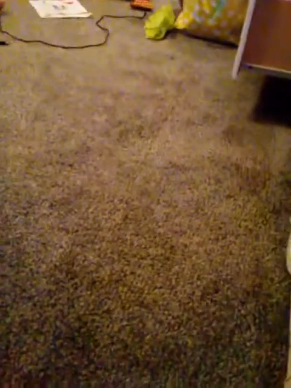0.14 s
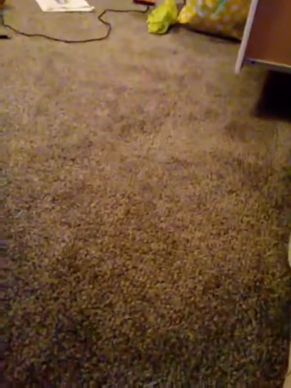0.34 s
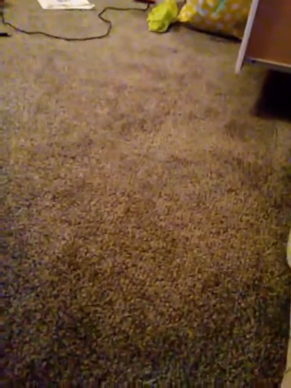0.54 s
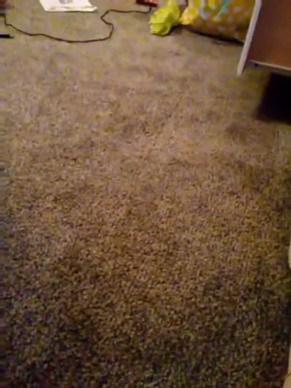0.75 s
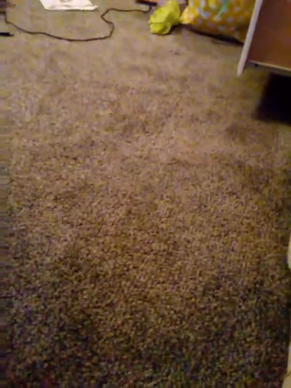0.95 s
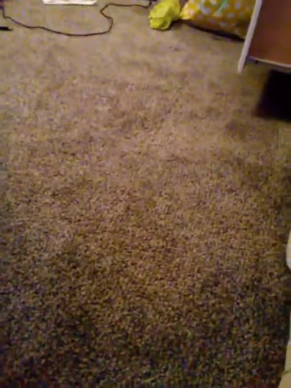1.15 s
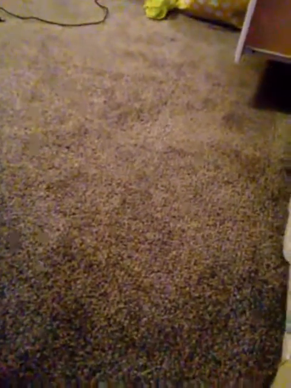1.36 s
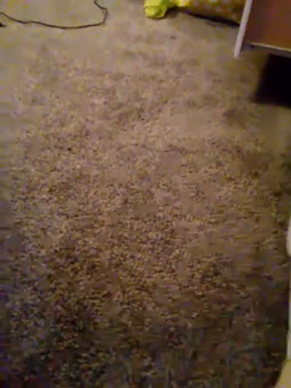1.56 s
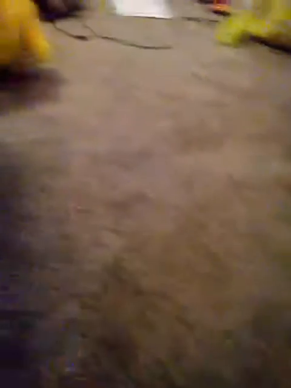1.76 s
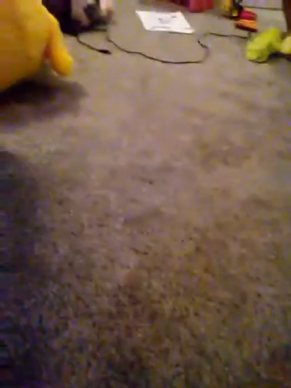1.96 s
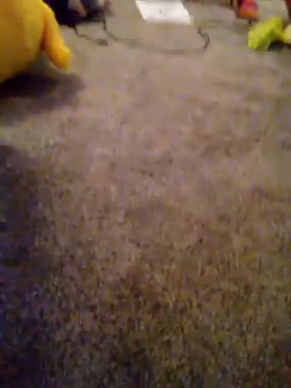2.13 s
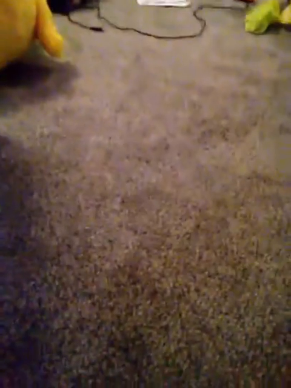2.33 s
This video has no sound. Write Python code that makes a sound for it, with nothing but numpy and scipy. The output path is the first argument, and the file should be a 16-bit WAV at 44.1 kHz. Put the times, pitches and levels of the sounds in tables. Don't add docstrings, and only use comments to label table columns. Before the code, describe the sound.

A rubber squeaky toy is squeezed close to a phone in a carpeted bedroom, the first squeak already ending, two more following with air hisses; then quiet finger ticks and a brief cloth rustle over faint hum.

```python
import sys
import numpy as np
from scipy import signal
from scipy.fft import rfft, irfft
from scipy.io import wavfile
from scipy.ndimage import uniform_filter1d, minimum_filter1d

SR = 44100
rng = np.random.default_rng(int(sys.argv[2]) if len(sys.argv) > 2 else 0)


def makeup_ratio(level_db):
    decades = np.asarray(level_db, float) / 20
    return 10 ** decades


def pcm_store(signal):
    levels = np.round(np.clip(np.atleast_2d(signal), -1, 1) * 32767)
    wavfile.write(sys.argv[1], SR, levels.astype(np.int16).T)


N = 109897


def curve(table, x):
    return np.interp(x, *np.array(table, float).T)


def colour(table):
    hz, db = np.array(table, float).T
    f = np.maximum(np.arange(N // 2 + 1) * SR / N, 1)
    gain = makeup_ratio(np.interp(np.log(f), np.log(hz), db, -60, -60))
    x = irfft(rfft(rng.standard_normal(N)) * gain, N)
    return x / np.std(x)


def walk(rate_hz):
    k = int(SR / rate_hz)
    held = np.repeat(rng.standard_normal(N // k + 1), k)
    return 1.2 * uniform_filter1d(uniform_filter1d(held, k), k)[:N]


def step(t, width_s):
    return 1 / (1 + np.exp(-np.clip(t / width_s, -40, 40)))


def puff(t, center_s, width_s):
    return np.exp(-((t - center_s) / width_s) ** 2)


def band(x, lo_hz, hi_hz):
    return signal.sosfilt(signal.butter(3, [lo_hz, hi_hz], "bandpass", fs=SR, output="sos"), x)


# (frequency [Hz], density [dB per Hz])
FLOOR_COLOUR = [(35, -18), (200, -11), (480, -5.5), (700, -8), (860, 0), (1150, -12.5), (4000, -19),
                (4400, -36)]
FLOOR_DB = -57.5
EARLY_DB, EARLY_ENDS_S = 2.5, .95


def room_noise(t, flicker):
    noise = colour(FLOOR_COLOUR)
    edges_hz = [30, 150, 400, 700, 1200, 2200, 4300]
    floor = 0
    for lo_hz, hi_hz in zip(edges_hz, edges_hz[1:]):
        floor = floor + band(noise, lo_hz, hi_hz) * makeup_ratio(1.9 * flicker + 1.2 * walk(47))
    return makeup_ratio(FLOOR_DB + EARLY_DB * step(EARLY_ENDS_S - t, .03)) * floor / np.std(floor)


HUM_HZ, HUM_DB = 245, -65.5


def appliance_hum(t):
    return makeup_ratio(HUM_DB + 3.5 * walk(18)) * np.sin(2 * np.pi * HUM_HZ * t)


HISS_DB = -76


def microphone_hiss(flicker):
    return makeup_ratio(HISS_DB + 1.1 * flicker) * colour([(4200, -3), (5500, -8), (9000, -2), (15700, -1)])


# (time [s], level [dB])
TICKS = [
    (1.157, -44),
    (1.25, -48.5),
    (1.297, -50.5),
    (1.408, -50.5),
    (1.564, -50),
    (1.671, -44.5),
    (1.704, -45.5),
    (2.164, -48.5),
    (2.419, -49),
]
# (frequency [Hz], level [dB])
TICK_COLOUR = [(100, -11), (900, 0.5), (4000, -12.5), (4400, -30), (12000, -23), (15600, -18.5)]
TICK_S = 0.0056


def handling_ticks(t):
    bursts = sum(makeup_ratio(db - 9.5) * puff(t, s + TICK_S, TICK_S) for s, db in TICKS)
    return bursts * colour(TICK_COLOUR)


# (time [s], level [dB])
RUSTLE = [
    (1.55, -77),
    (1.64, -63),
    (1.69, -53),
    (1.74, -56),
    (1.9, -53),
    (2.03, -57),
    (2.07, -63),
    (2.16, -78),
]
# (frequency [Hz], level [dB])
CLOTH_COLOUR = [(60, -5.5), (900, -1), (2000, -7.5), (4000, -6), (4400, -31.5), (5700, -28), (6800, -11),
                (15500, -24.5)]
MURK_DB = -60.5


def cloth_rustle(t):
    moving = abs(t - 1.85) < .33
    rub = makeup_ratio(curve(RUSTLE, t) + 1.1 * walk(90)) * moving * colour(CLOTH_COLOUR)
    murk = makeup_ratio(MURK_DB) * puff(t, 2.07, .04) * colour([(60, -4), (900, 4), (3500, -15)])
    return rub + murk


DIP_TIMES_S = [
    .547,
    1.578,
    1.982,
    2.048,
    2.12,
    2.169,
]
DIP_S, DIP_DB = .0025, -11


def background(t):
    flicker = walk(110)
    steady = room_noise(t, flicker) + appliance_hum(t) + microphone_hiss(flicker)
    gate = makeup_ratio(sum(DIP_DB * puff(t, s, DIP_S) for s in DIP_TIMES_S))
    return (steady + handling_ticks(t) + cloth_rustle(t)) * gate


ROOM_T60_S, ROOM_DB, LATE_T60_S, LATE_DB, ROOM_GAP_S = .10, -14.5, .28, -32.5, .003
SOAK_LO_HZ, SOAK_HI_HZ, SOAK = 4400, 5500, .7


def room(x):
    t = np.arange(SR // 3) / SR
    echo = 0
    for t60_s, db in ((ROOM_T60_S, ROOM_DB), (LATE_T60_S, LATE_DB)):
        tail = rng.standard_normal(len(t)) * makeup_ratio(-60 * t / t60_s) * step(t - ROOM_GAP_S, 0.00055)
        echo = echo + makeup_ratio(db) * tail / np.sqrt(np.sum(tail ** 2))
    soak = signal.butter(1, [SOAK_LO_HZ, SOAK_HI_HZ], "bandpass", fs=SR, output="sos")
    echo = echo - SOAK * signal.sosfilt(soak, echo)
    return signal.fftconvolve(x, echo)[:len(x)]


# (time [s], level [dB])
THUMPS = [
    (0, -43.5),
    (.262, -49),
    (.333, -49.5),
    (.612, -52),
    (.665, -54),
]
THUMP_S = .014


def low_thumps(t):
    puffs = sum(makeup_ratio(db) * puff(t, s, THUMP_S) for s, db in THUMPS)
    return puffs * colour([(20, -6.5), (60, -2.5), (150, -15)])


SPUTTER_DB, SPUTTER_S, SPUTTER_LENGTH_S = -31, .641, .017


def sputter(t):
    leak = makeup_ratio(SPUTTER_DB) * np.exp(-((t - SPUTTER_S) / SPUTTER_LENGTH_S) ** 4)
    spectrum = [(7800, -6), (8700, -2.5), (9400, -14), (10300, -13.5), (10800, -3), (11400, -16)]
    return np.array([leak * colour(spectrum) for _ in range(2)])


# (refill ends [s], refill level [dB], squeeze hiss starts [s], hiss level at reed start [dB])
AIR = [
    (.165, -51, -0.18, -45),
    (.51, -54, .205, -50.5),
    (.905, -50.5, .548, -49),
]
# (frequency [Hz], density [dB per Hz])
JET_COLOUR = [(4300, -24), (5000, -19), (5600, -26), (6200, -2), (7900, 1), (8300, -9), (9200, -3),
              (9800, -13), (15600, -18)]
AIR_RISE_DB_S, AIR_FALL_DB_S, BLOW_DB, WIDE_DB = 150.5, 35, -40, -47
CHIFF_DB, CHIFF_S, GASP_DB, GASP_S = -28, .0025, -25.5, .008


def air(t, swing):
    level = makeup_ratio(BLOW_DB) * swing
    chiff, gasp = 0, 0
    for (start, _, stop, _, _), (refill_end, refill_db, begin, lead_db) in zip(SQUEAKS, AIR):
        refill = makeup_ratio(refill_db - AIR_FALL_DB_S * (t - stop))
        level = level + refill * step(t - stop, .01) * step(refill_end - t, .012)
        squeeze = makeup_ratio(lead_db + AIR_RISE_DB_S * np.minimum(t - start, 0))
        level = level + squeeze * step(t - begin, .003) * (t < start)
        chiff = chiff + makeup_ratio(CHIFF_DB) * puff(t, start, CHIFF_S)
        gasp = gasp + makeup_ratio(GASP_DB) * puff(t, stop, GASP_S)
    jet = level * makeup_ratio(3.1 * walk(60)) * colour(JET_COLOUR)
    wide = (makeup_ratio(WIDE_DB) * swing + chiff) * colour([(60, -9), (600, -8), (1500, 1), (7500, -3)])
    gasps = gasp * colour([(1500, -21.5), (4000, -10.5), (6500, 0), (8000, -7), (9800, -20)])
    return jet + wide + gasps


# (reed starts [s], pressure peaks [s], reed stops [s], top pitch [Hz], level [dB])
SQUEAKS = [
    (-.08, -.064, .007, 1090, -5),
    (0.2434, 0.296, .372, 1108, -6),
    (0.6084, 0.621, .684, 1064, -3.5),
]
# (level [dB], ..)
GRIPS = [
    [-11, -17, -11.5, -14, -0.5, -3, -4, -10, -19, -37, -48, -48, -50.5, -55],
    [-10, -18.5, -7, -13.5, 2, 0.5, -1, -10, -17.5, -35, -38, -32.5, -47.5, -42],
    [-9, -15, -11, -7.5, 0, 0, -1.5, -14.5, -13.5, -27.5, -46, -32.5, -50.5, -45],
]
# (frequency [Hz], gain [dB])
PORT_LOW = [(2000, 1), (2200, -9), (2900, -10), (3100, 1), (3250, 0)]
PORT = [(4100, -0.5), (4250, -7.5), (4450, 3.5), (4950, -5.5), (5180, -13), (5500, -2), (7350, 3),
        (7700, -25.5)]
PORT_TOP = [(7700, 0), (7950, 27.5), (8250, 24.5), (8800, 12), (9300, 28.5), (9800, 11.5), (10300, 26)]
ARCH_HZ_S2, SAG_HZ_S4 = 14000, 3.0e6
KICK_HZ, KICK_S, KICK_LEAD_S, SNAP_S = 160, .0012, .001, .0006
ATTACK_S, RELEASE_S, LINGER_S, SHARPEN = .0024, 0.0013, .005, 0.23
FADE_DB_PER_HZ, DULL_DB_PER_HZ, UNSTEADY_DB_PER_HZ = 0.0618, 0.07, .06
WOBBLE, WOBBLE_DB = .0004, .5


def reed(t):
    tone, swing = np.zeros(N), np.zeros(N)
    for (start, peak, stop, top_hz, db), grip in zip(SQUEAKS, GRIPS):
        d = np.clip(t, start - .02, stop + .012) - peak
        sag_hz = ARCH_HZ_S2 * d ** 2 + SAG_HZ_S4 * np.maximum(d, 0) ** 4
        kick_hz = KICK_HZ * step(start - KICK_LEAD_S - t, KICK_S)
        hz = (top_hz - sag_hz - kick_hz) * (1 + WOBBLE * walk(120))
        phase = 2 * np.pi * np.cumsum(hz) / SR
        drive = step(t - start, ATTACK_S) * step(stop + LINGER_S - t, RELEASE_S)
        snap = step(t - start, SNAP_S) * step(stop - t, RELEASE_S)
        swing += snap
        for k, part_db in enumerate(grip):
            port_db = sum(curve(part, (k + 1) * hz) for part in (PORT_LOW, PORT, PORT_TOP))
            fade_db = (FADE_DB_PER_HZ + DULL_DB_PER_HZ * max(k - 8, 0)) * sag_hz
            unsteady_db = WOBBLE_DB + UNSTEADY_DB_PER_HZ * sag_hz * (d > 0) * (k > 1)
            gain = makeup_ratio(db + part_db + port_db - fade_db + unsteady_db * walk(130))
            envelope = snap ** (1 + SHARPEN * k) if k else drive
            tone += gain * envelope * np.sin((k + 1) * (phase + .4 * k))
    return tone, swing


LEAD_S = .1


def scene():
    t, lead = np.arange(N) / SR, int(LEAD_S * SR)
    toy_t = t - LEAD_S
    tone, swing = reed(toy_t)
    toy = tone + air(toy_t, swing) + low_thumps(toy_t)
    in_room = np.append((toy + room(toy))[lead:], np.zeros(lead))
    return in_room + background(t) + sputter(t)


def low_pass(x):
    return signal.sosfilt(signal.butter(12, 15700, fs=SR, output="sos"), x)


MIRROR_HZ, MIRROR_DB, MIRROR_LO_HZ, MIRROR_HI_HZ = 16000, -28, 8500, 9800
CEILING, LIMIT_S, TOP_HZ = .99, .004, 15700


def record(dry):
    t = np.arange(N) / SR
    mirror = band(dry * np.cos(2 * np.pi * MIRROR_HZ * t), MIRROR_LO_HZ, MIRROR_HI_HZ)
    x = dry + 2 * makeup_ratio(MIRROR_DB) * mirror
    span = int(LIMIT_S * SR)
    headroom = np.minimum(CEILING / (abs(x).max(axis=0) + 1e-9), 1)
    limited = x * uniform_filter1d(minimum_filter1d(headroom, size=span), size=span)
    mix = signal.sosfilt(signal.ellip(8, .2, 70, TOP_HZ, fs=SR, output="sos"), limited)
    return low_pass(mix)


dry = scene()
out = record(dry)
pcm_store(out)
```